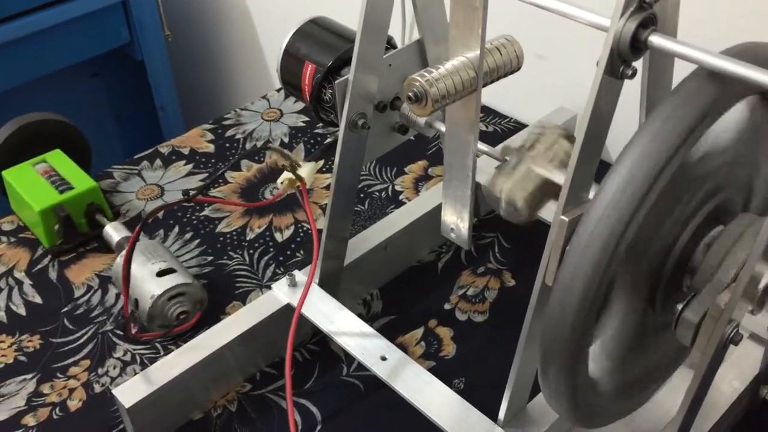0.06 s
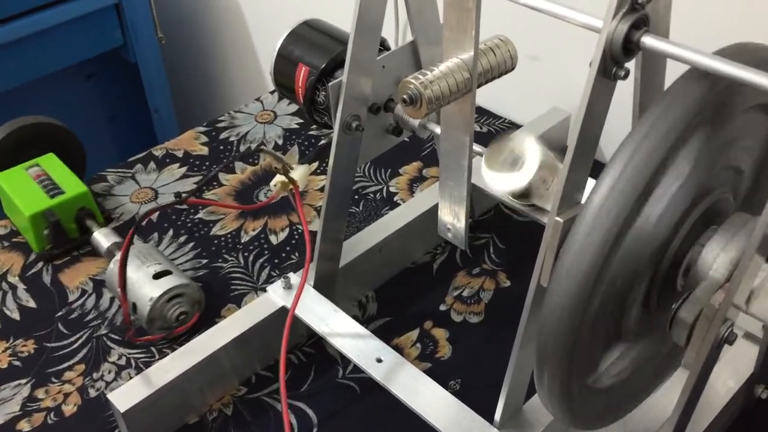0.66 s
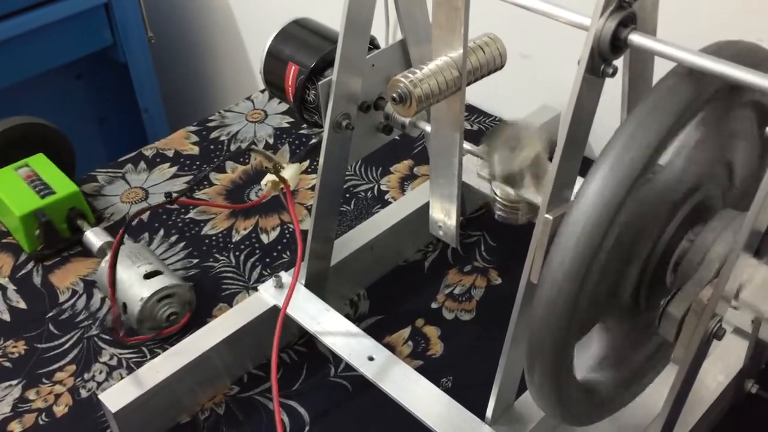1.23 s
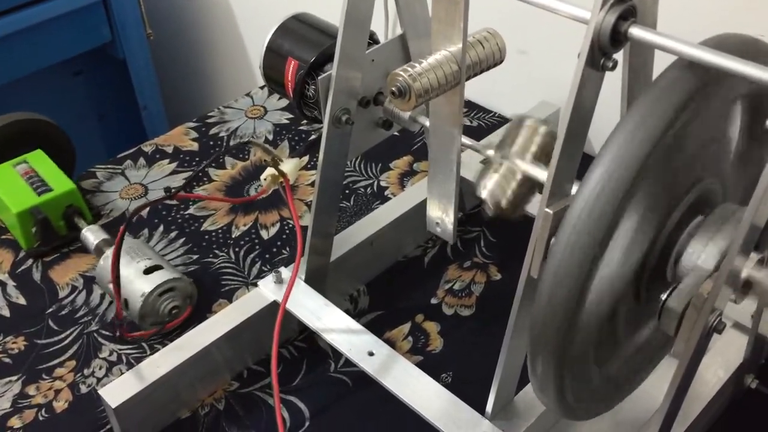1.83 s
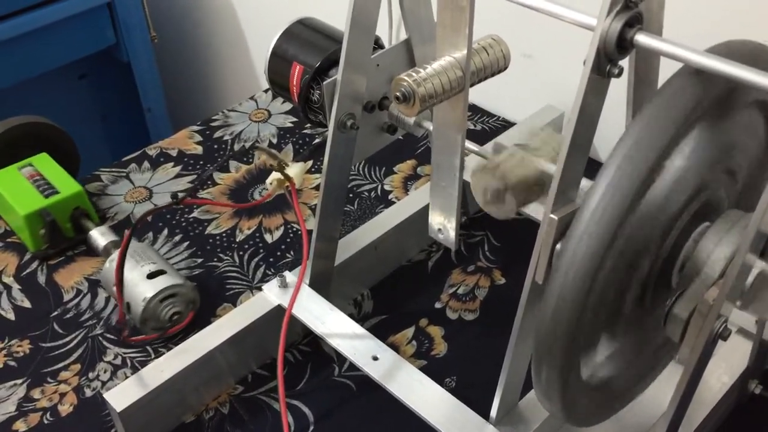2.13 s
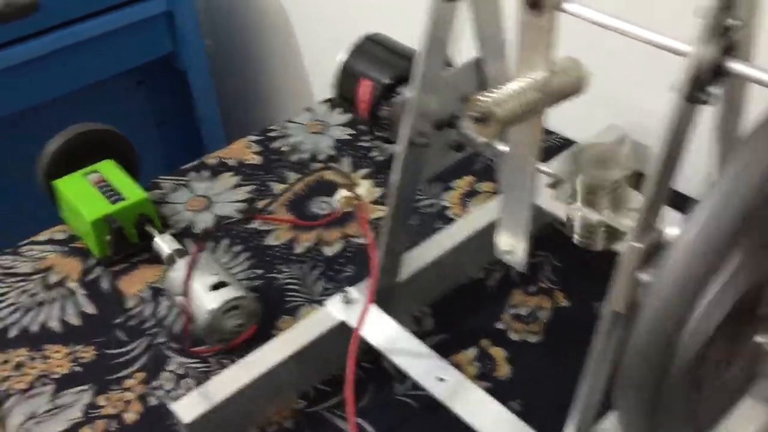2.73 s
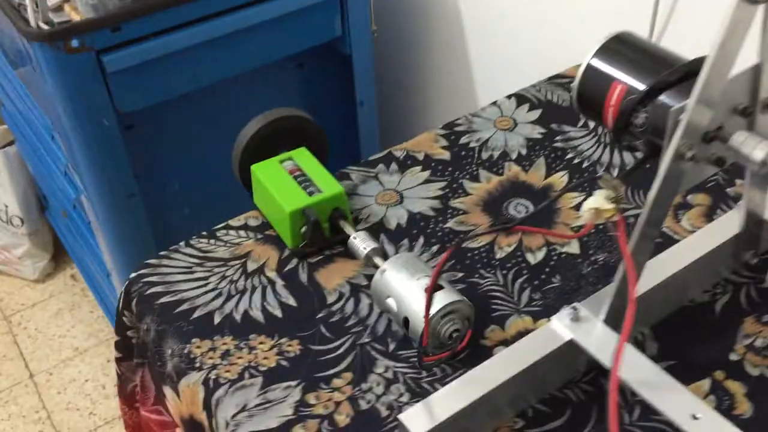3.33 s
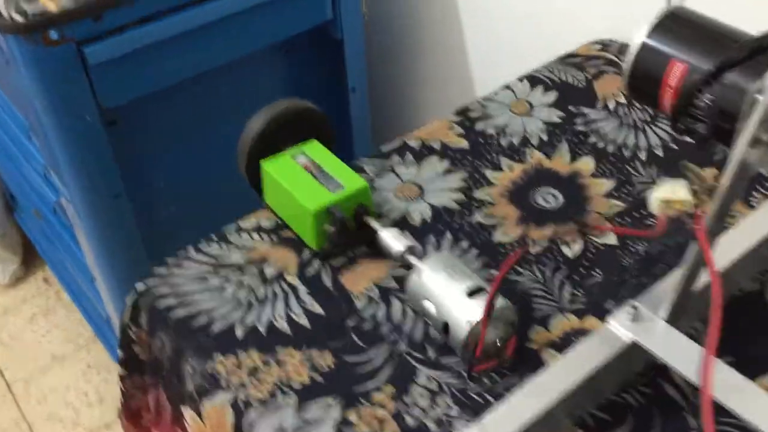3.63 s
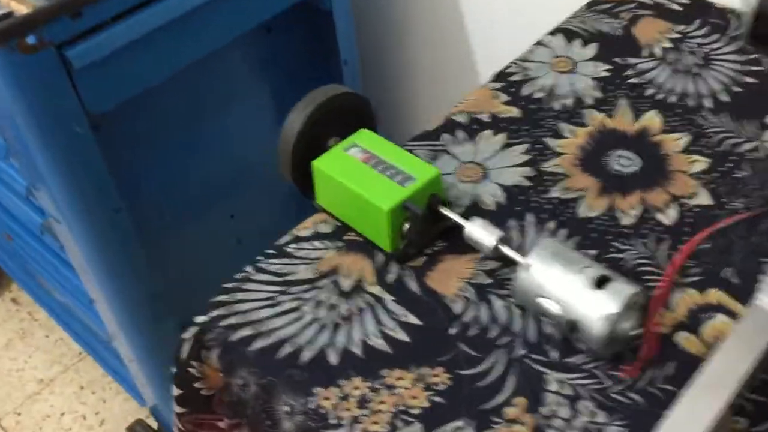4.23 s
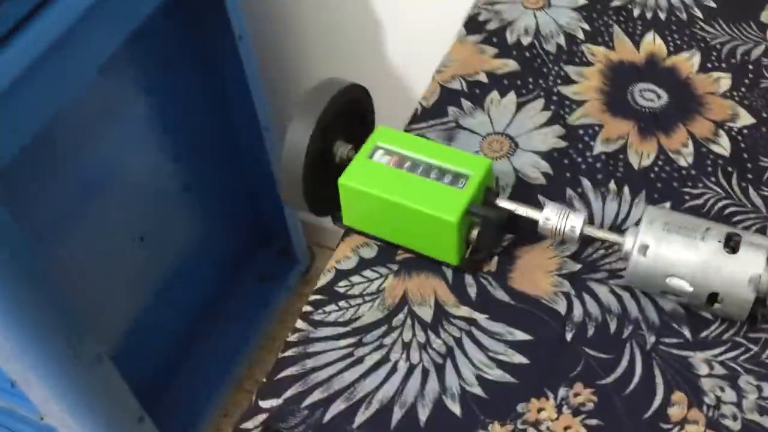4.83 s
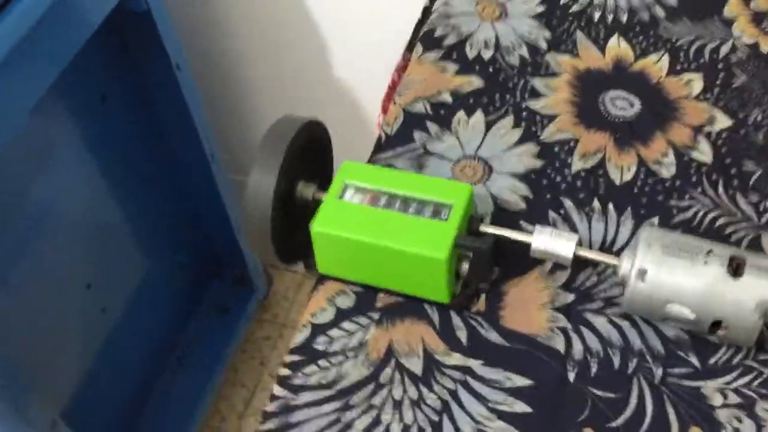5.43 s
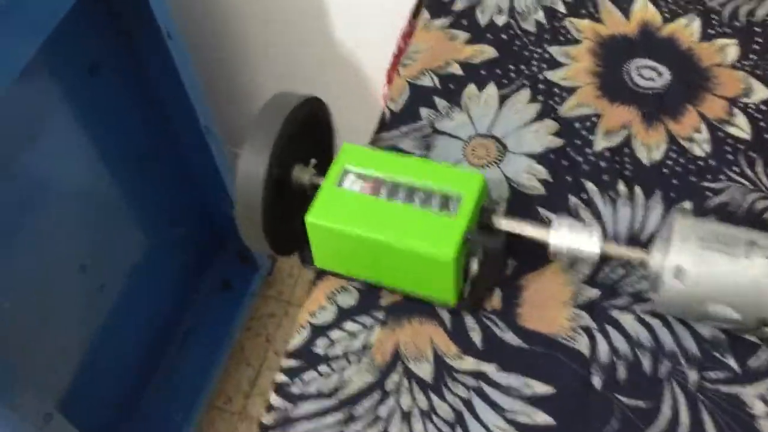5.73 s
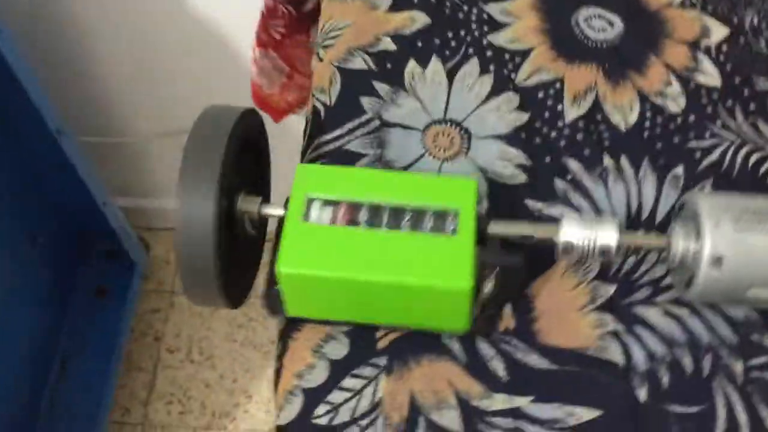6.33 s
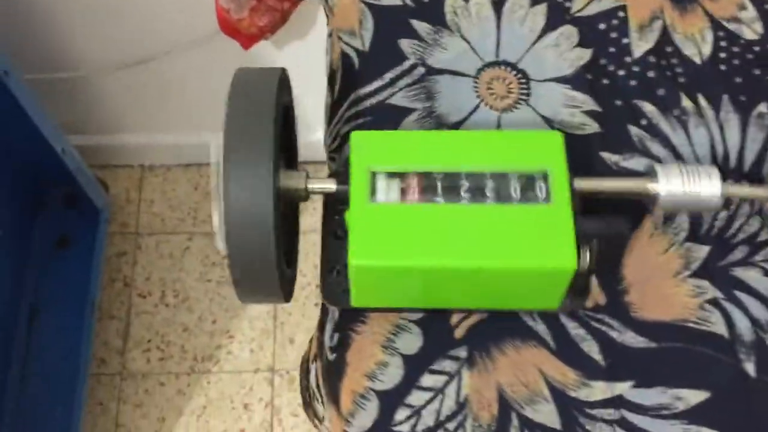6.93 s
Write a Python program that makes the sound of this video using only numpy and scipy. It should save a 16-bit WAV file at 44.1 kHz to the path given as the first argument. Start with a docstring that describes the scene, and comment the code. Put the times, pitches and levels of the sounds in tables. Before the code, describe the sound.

A motor-driven flywheel machine runs indoors with a churning whirr, light uneven metal knocks and a low, pulsing boom from the table. As the microphone moves along it, the rough whine of a small motor swells and fades. The fast, rasping chatter of a mechanical counter's gears takes over, close and louder, with a ringing whine from its plastic case and scattered sharp clicks. A faint hum continues underneath.

```python
"""Flywheel rig and turn counter

In a small room, a homemade crank-and-flywheel rig whirrs and clinks on a cloth-covered table, which
booms over a low electrical hum. Beside it a small whining motor spins a mechanical turn counter whose
gears chatter twice a turn and ring its plastic case. The microphone starts at the rig, passes over
the motor and ends close to the counter."""
import sys
import numpy as np
from scipy import signal
from scipy.fft import rfft, irfft
from scipy.io import wavfile
from scipy.ndimage import uniform_filter1d

SR = 44100
rng = np.random.default_rng(int(sys.argv[2]) if len(sys.argv) > 2 else 0)


def digitize_waveform(pressure):
    """Quantize a signal to 16-bit integers and store it at the path in sys.argv[1].

    Rows of a 2-D input are taken as channels; values are limited to [-1, 1].
    """
    field = np.atleast_2d(pressure).T
    bounded = np.clip(field, -1, 1)
    quanta = np.round(bounded * 32767).astype(np.int16)
    wavfile.write(sys.argv[1], SR, quanta)


N = 316638
TIME = np.arange(N) / SR
SHAFT_HZ, TEETH = 10.715, 15   # the counter's drive gear


# the plastic case and its gears, heard close up: (frequency [Hz], level [dB])
CASE_COLOUR = [(350, -34), (500, -38.5), (610, -18), (740, -19.5), (810, -12.5), (980, -13.5), (1060, -7.5),
               (1220, -5), (1420, 0.5), (1620, -2), (1750, -11.5), (2000, -17), (3000, -51)]
GEAR_COLOUR = [(1200, -18.5), (2000, -11), (2300, 4), (2600, -1.5), (2900, 1), (3400, -1.5), (4500, -4.5),
               (4900, -7.5), (5400, -8), (6300, -10), (7500, -16.5), (9700, -16.5), (10600, -23),
               (15500, -32.5)]
# resonances of the gears: (frequency [Hz], width [Hz], level [dB])
GEAR_RESONANCES = [(2875, 186, 0.5), (3370, 80, -19), (5240, 100, -17)]
def counter(whirr_db, rasp_db):
    """The gears bind twice a turn and strike louder under load; their brightness flickers at random."""
    bind = np.cos(4 * np.pi * (SHAFT_HZ * TIME + 0.12))
    contacts = scatter(gear_contacts(jitter=.14, uneven_db=5.0, scrape_db=3.5), fade_s=0.001)
    contacts = room(contacts * from_db(2.2 * bind), wet_db=-8.5, t60=0.17)
    clatter = from_db(whirr_db - 6.3) * steady(body(contacts, CASE_COLOUR), size=3000)
    # the case's main resonance rings on from tooth to tooth as a whine
    note = resonance(resonance(contacts, hz=1576, width=50), hz=1576, width=50)
    whine = from_db(whirr_db - 5.8 + 2 * bind) * steady(note, size=2060)
    rasp = body(contacts, GEAR_COLOUR, GEAR_RESONANCES)
    dull = signal.lfilter(*signal.butter(1, 3500, fs=SR), rasp)
    flicker = from_db(0.21 * bind + 6.4 * wander(per_s=21))
    return clatter + whine + from_db(rasp_db - 2.3) * steady(dull + flicker * (rasp - dull), size=4120)


def gear_contacts(jitter, uneven_db, scrape_db):
    """One click per tooth, early or late through backlash, with scraping in between."""
    teeth = np.arange(int(N / SR * SHAFT_HZ * TEETH))
    lateness, force, polarity = rng.standard_normal((len(teeth), 3)).T
    at = ((teeth + jitter * lateness) / (SHAFT_HZ * TEETH) * SR).astype(int)
    clicks = np.zeros(N)
    clicks[at % N] = from_db(uneven_db * np.clip(force, -2, 2)) * np.sign(polarity)
    return rms_one(clicks) + from_db(scrape_db) * grains(per_s=4000, spread_db=3.0)


# how hard the gears catch, as heard at the microphone: (time [s], rasp level [dB])
CATCH_LEVEL = [(0, -69), (2.3, -53), (3.3, -47), (3.7, -45.5), (4.55, -48), (5.25, -45), (5.6, -40),
               (6.15, -38), (6.6, -50), (7.18, -50)]
# a tooth snags and the catch is harder: (time [s], rasp level [dB], case ring level [dB])
TOOTH_SNAGS = [(2.515, -52, -34), (3.026, -39.5, -36), (3.444, -39.5, -30.5), (3.498, -39.5, -36.5),
               (3.540, -44, -28.5), (3.637, -40, -31.5), (3.727, -43, -29.5), (3.872, -41.5, -31),
               (3.913, -42, -29.5), (3.960, -37, -34), (3.997, -50, -30), (4.099, -37.5, -31),
               (4.188, -42, -30), (4.328, -44, -29.5), (4.381, -44, -30), (4.430, -41.5, -27),
               (4.486, -48, -33), (4.562, -43, -26.5), (4.667, -42, -29.5), (4.803, -37.5, -32),
               (4.847, -38.5, -28.5), (4.889, -40, -36), (4.936, -39, -27), (5.036, -39.5, -26.5),
               (5.086, -41, -31.5), (5.222, -35, -24.5), (5.270, -37, -34), (5.313, -37.5, -23),
               (5.405, -36, -29), (5.500, -41, -31), (5.595, -36, -27.5), (5.641, -38.5, -33.5),
               (5.689, -34.5, -25.5), (5.736, -37.5, -26.5), (5.829, -37.5, -28), (5.875, -36.5, -27.5),
               (5.92, -39.5, -24), (5.965, -35, -28), (6.015, -34.5, -30.5), (6.056, -36, -23.5),
               (6.112, -43, -28), (6.154, -33, -24), (6.201, -34, -22.5), (6.248, -31.5, -23.5),
               (6.299, -35, -28.5), (6.337, -35.5, -28), (6.432, -42, -27), (6.486, -39.5, -32),
               (6.574, -40, -37), (6.708, -42, -28.5), (6.765, -41.5, -33), (6.851, -46, -30),
               (6.904, -50, -29), (7.000, -47, -28), (7.132, -37, -27)]
def catches():
    """Twice a turn several teeth strike hard in a row: a bright rasp over the ring of the case."""
    lead_s, jitter_s, build_s = .005, .004, .010
    second_catch_db, spread_db = -4.5, 3
    half_turn = np.arange(1, int(N / SR * 2 * SHAFT_HZ) + 1)
    lateness, force, ring_force = rng.uniform(-1.1, 1, (len(half_turn), 3)).T
    times = half_turn / (2 * SHAFT_HZ) - lead_s + jitter_s * lateness
    rasp_db = np.interp(times, *np.transpose(CATCH_LEVEL))
    rasp_db += second_catch_db * (half_turn % 2) + spread_db * force
    ring_db = rasp_db + 10 + 2.5 * ring_force
    for snag in TOOTH_SNAGS:
        nearest = np.argmin(abs(times - snag[0]))
        times[nearest], rasp_db[nearest], ring_db[nearest] = snag
    rasp = bursts(times - build_s, rasp_db, hard_contact(),
                  rise_s=0.0045, fade_s=0.012, bounce_s=0.0063, contact_s=0.00089)
    ring = case_ring(times, ring_db)
    return room(rasp, wet_db=-9.5, t60=0.28) + ring


# the case's main resonance: (frequency [Hz], width [Hz], level [dB])
CASE_RESONANCES = [(1570, 28, 16.5)]
def case_ring(times, levels_db, swell_s=0.016):
    """The ring of the plastic case swells and sinks around each catch."""
    swell = np.zeros(N)
    level_over_30ms = np.sqrt(.03 / swell_s / np.sqrt(np.pi / 2))
    for at, db in zip(times, levels_db):
        during = slice(*np.searchsorted(TIME, [at - .06, at + .06]))
        bell = np.exp(-((TIME[during] - at) / swell_s) ** 2)
        swell[during] += from_db(db) * bell * level_over_30ms
    ring = body(grains(per_s=700, spread_db=1.0), CASE_COLOUR, CASE_RESONANCES)
    return swell * steady(ring, size=600)


# the pinion, rung only by hard contacts: (frequency [Hz], width [Hz], level [dB])
PINION_RESONANCES = [(2910, 46, -1.5), (3020, 45, -4), (3740, 53, -4.5), (4520, 87, -3), (5330, 110, 0),
                     (6280, 170, -4), (8230, 300, -5), (10030, 230, -8), (12500, 200, -5)]
def hard_contact():
    """Ring of the gears when struck hard, with more treble than in free running."""
    return signal.lfilter([1, -.3], [1], response(GEAR_COLOUR, GEAR_RESONANCES + PINION_RESONANCES))


# crisp clicks, close to the counter: (time [s], level [dB])
TOOTH_SLAPS = [(3.7226, -43), (3.777, -43), (3.993, -55), (4.142, -42), (4.277, -43.5), (4.370, -50),
               (4.464, -43), (4.553, -47), (5.269, -37.5), (5.4925, -39), (5.957, -38.5), (6.053, -38),
               (6.238, -40), (6.608, -35.5), (6.625, -41), (6.767, -43), (6.8507, -38.5), (6.889, -38.5),
               (6.943, -38), (6.9475, -43), (7.044, -53), (7.081, -42)]
def slaps():
    """A single tooth slaps across its backlash: a bright click and a short ring of the case."""
    times, db = np.transpose(TOOTH_SLAPS)
    click = bursts(times, db, hard_contact(),
                   rise_s=0.00046, fade_s=0.0022, bounce_s=0.0044, contact_s=0.0028)
    ring = bursts(times, db + 2, response(CASE_COLOUR),
                  rise_s=0.00022, fade_s=0.0022, bounce_s=.004, contact_s=0.002)
    return room(click + ring, wet_db=-8.5, t60=0.13)


# one-off hits near the microphone: (time [s], level [dB])
METAL_TICKS = [(5.564, -28)]
CASE_KNOCKS = [(5.2688, -27)]
STEEL_PINGS = [(4.142, -41.5)]
# what each hit rings: (frequency [Hz], level [dB], t60 [s])
TICK_RING = [(6350, -3, 0.03), (6560, 2, 0.022), (8500, 0, 0.014), (11200, 3, 0.011), (12500, -6, .01),
             (14000, -12, .008)]
KNOCK_RING = [(743, -1, 0.042), (1180, -7, .025), (2310, -4, .04), (6500, -2, 0.02)]
PING_RING = [(3470, 2, 0.34), (3500, 0, .3)]
def jolted_parts():
    """A bright metal tick, a hollow knock of the counter's case and the ping of a jolted steel part."""
    tick = struck(METAL_TICKS, TICK_RING)
    knock = struck(CASE_KNOCKS, KNOCK_RING)
    return tick + knock + struck(STEEL_PINGS, PING_RING)


# whirr and rasp, heard from beside the rig: (frequency [Hz], level [dB])
RIG_WHIRR_COLOUR = [(300, -18.5), (500, -29), (620, -16), (740, -22), (800, -11.5), (880, -16.5),
                    (1050, -15), (1120, -15.5), (1210, -3), (1400, 0), (1640, -1.5), (1730, -15),
                    (1880, -8), (2050, -44.5), (3000, -46)]
RIG_RASP_COLOUR = [(1200, -20), (2200, 7.5), (2900, -2), (3700, -3.5), (4100, -11.5), (5600, -14),
                   (6700, -13), (7500, -26.5), (9700, -19.5), (10700, -36), (12000, -22.5), (15500, -71)]
# resonances of the frame: (frequency [Hz], width [Hz], level [dB])
FRAME_RESONANCES = [(3010, 25, 2), (3770, 79, -2), (4480, 60, 7.5), (5430, 120, 6.5), (11500, 30, 8)]
def rig(whirr_db, rasp_db):
    """Brushes, belt and bearings: dense contacts ringing the aluminium frame, churning with the load."""
    churn = wander(per_s=24)
    contacts = room(grains(per_s=1200, spread_db=2.0), wet_db=-5.5, t60=0.14)
    wavering = waver(body(contacts, RIG_WHIRR_COLOUR), sway_s=.0005, per_s=18)
    whirr = from_db(whirr_db + .7 * churn) * steady(wavering, size=2400)
    rasp = body(scatter(contacts, fade_s=0.00094), RIG_RASP_COLOUR, FRAME_RESONANCES)
    return whirr + from_db(rasp_db + 1.0 + 0.81 * churn) * steady(rasp)


# knocks in the crank links while the microphone is near the rig: (time [s], level [dB], fade [s])
LINK_KNOCKS = [(0.022, -52, .004), (0.098, -52, 0.0033), (0.2145, -50, .004), (0.3072, -56, .003),
               (0.3845, -50, .004), (0.5225, -51.5, .003), (0.672, -55, .003), (0.7906, -46, .006),
               (0.893, -59, .003), (0.9585, -49, .006), (1.2435, -59, .003), (1.268, -54, .003),
               (1.368, -55, .006), (1.458, -50, .003), (1.518, -53, .003), (1.5535, -52, .004),
               (1.7346, -47, 0.0046), (1.756, -50, .003), (2.1186, -51.5, .003), (2.2232, -51, .003),
               (2.514, -51, 0.0027), (2.778, -46, .006), (2.9377, -53, 0.0027), (3.0165, -50, 0.01),
               (3.1153, -48.5, .004), (3.168, -45.5, .004), (3.216, -46, .004), (3.4363, -41, 0.0045)]
# their ring in the frame: (frequency [Hz], level [dB])
LINK_COLOUR = [(1200, -27), (2600, -2.5), (3700, 6.5), (4200, -4), (5500, 1), (6700, -2), (7800, -8),
               (9600, -9), (10700, -21), (12000, -20), (15500, -33)]
def clinks(rattle_per_s=6.8, rattle_db=-54, rattle_fade_s=.005):
    """Loose crank pins knock in their links and ring the frame, amid a light, uneven rattle."""
    rattle_times = np.cumsum(.5 + rng.random(size=100)) / rattle_per_s
    rattle = [(at, rattle_db, rattle_fade_s) for at in rattle_times if at < N / SR]
    times, db, fade_s = np.transpose(LINK_KNOCKS + rattle)
    ring = response(LINK_COLOUR, modes=[(4490, 60, 1), (5520, 70, 7), (6770, 80, -1.0), (9700, 150, 4)])
    knocks = bursts(times, db, ring, rise_s=0.00052, fade_s=fade_s, bounce_s=0.0039, contact_s=0.0035)
    return room(knocks, wet_db=-1.5, t60=0.15)


# the whine as the microphone passes over the motor: (time [s], level [dB])
MOTOR_PASS = [(0, -54), (2.7, -58), (3.1, -44), (3.5, -37.5), (4.0, -37), (4.3, -40), (4.6, -49),
              (7.18, -48)]
# resonances of the motor's can: (frequency [Hz], width [Hz], level [dB])
CAN_RESONANCES = [(1193, 200, -1.5), (1615, 90, 1), (1701, 154, 0), (1793, 134, 1), (2154, 190, -9),
                  (2450, 270, -7.5), (2790, 110, -8), (3450, 250, -11), (5850, 560, -12.5),
                  (8440, 3300, -15)]
def small_motor():
    """Brush contacts ring the motor's can in a rough whine."""
    brushes = grains(per_s=1800, spread_db=6.0)
    whine = sum(from_db(db) * rms_one(resonance(resonance(brushes, hz, width), hz, width))
                for hz, width, db in CAN_RESONANCES)
    return from_db(in_time(MOTOR_PASS)[0]) * steady(whine)


# the table under the rig: (frequency [Hz], level [dB])
TABLE_COLOUR = [(20, -84), (36, -37), (46, -9), (70, -10), (95, -9), (115, 3), (135, -0.5), (160, -8.5),
                (210, -12.5), (300, -20.5), (480, -25), (900, -58.5)]
# its boom along the microphone's path: (time [s], level [dB])
BOOM_LEVEL = [(0, -46), (2.2, -44.5), (3.0, -43.8), (3.4, -48.5), (4.2, -46.5), (4.85, -56), (5.5, -53),
              (5.95, -46), (6.3, -51.5), (7.18, -46.5)]
# the flywheel lurches and the boom swells: (time [s], boost [dB])
FLYWHEEL_LURCHES = [(0.61, 4), (2.53, 2), (2.80, 4), (3.81, 5), (5.79, 7), (6.02, 2.5), (6.61, 9)]
def table_boom(throb_hz=3.688, throb_peak_s=.056, throb_db=1.5, lurch_s=0.034, split_hz=191):
    """The running rig shakes the table: a throbbing boom at its own note, with an even rumble above."""
    shaking = steady(body(rng.standard_normal(N), TABLE_COLOUR, modes=[(124.4, 9.7, -4.5)]))
    boom = signal.sosfiltfilt(signal.butter(3, split_hz, fs=SR, output="sos"), shaking)
    rumble = from_db(-47) * (shaking - boom)
    throb = throb_db * np.cos(2 * np.pi * throb_hz * (TIME - throb_peak_s)) + 0.15 * wander(per_s=14)
    lurch = sum(db * np.exp(-((TIME - at) / lurch_s) ** 2) for at, db in FLYWHEEL_LURCHES)
    return from_db(in_time(BOOM_LEVEL)[0] + throb + lurch) * boom + rumble


# background hum, the same all along the path: (frequency [Hz], level [dB])
ELECTRICAL_TONES = [(94, -61.5), (100, -57), (118, -56), (150, -63), (172, -68.5), (215, -68.5), (403, -71)]
def electrical_hum():
    """The mains and the motors' rotors hum in steady tones."""
    return sum(from_db(db) * np.sqrt(2) * np.sin(2 * np.pi * (hz * TIME + rng.random()))
               for hz, db in ELECTRICAL_TONES)


def bursts(times, levels_db, ring, rise_s, fade_s, bounce_s, contact_s, size=2600):
    """Each burst is a swelling, fading run of short gritty bounces; its level is the rms over 30 ms."""
    out, age = np.zeros(N + 4 * size), TIME[:size]
    for at, db, fade in zip(times, levels_db, np.broadcast_to(fade_s, len(times))):
        shape = (1 - np.exp(-age / rise_s)) ** 2 * np.exp(-age / fade)
        since_bounce = age % (bounce_s * rng.uniform(.75, 1.25))
        bounces = rng.standard_normal(size) * (0.28 + np.exp(-since_bounce / contact_s))
        burst = signal.fftconvolve(bounces * shape, ring)
        start = max(int(at * SR), 0)
        out[start:start + len(burst)] += from_db(db) * np.sqrt(.03 * SR) * burst / np.linalg.norm(burst)
    return out[:N]


def struck(hits, modes):
    """Two small parts touch and ring for an instant; they radiate little below their lowest mode."""
    out = np.zeros(N)
    for at, db in hits:
        age = np.clip(TIME - at, 0, .5)
        out += sum(from_db(db + mode_db - 60 * age / t60) * np.sin(2 * np.pi * hz * age)
                   for hz, mode_db, t60 in modes)
    out = signal.sosfilt(signal.butter(5, .82 * modes[0][0], "high", fs=SR, output="sos"), out)
    return room(out, wet_db=-15, t60=.12)


def grains(per_s, spread_db):
    """Tiny contacts at random moments, of uneven size; rms 1."""
    sizes = from_db(spread_db * np.minimum(rng.exponential(1, N), 4)) * rng.choice([-1, 1], N)
    return rms_one(sizes * (rng.random(N) < per_s / SR))


def body(x, colour, modes=()):
    """Contacts heard through a ringing body."""
    return signal.fftconvolve(x, response(colour, modes))[:N]


def response(colour, modes=(), size=4096):
    """Causal ring of a body, of unit energy: a broad colour plus a few sharp resonances."""
    hz, db = np.transpose(colour)
    bin_hz = np.arange(size // 2 + 1) * SR / size
    gain = from_db(np.interp(np.log(bin_hz + 1), np.log(hz), db))
    cepstrum = irfft(np.log(gain))[:size // 2]
    cepstrum[1:] *= 2   # minimum phase
    ring = irfft(np.exp(rfft(cepstrum, size)))
    ring = ring + sum(from_db(lift) * resonance(ring, centre, width) for centre, width, lift in modes)
    return ring / np.linalg.norm(ring)


def resonance(x, hz, width):
    """Two-pole band-pass with gain 1 on top."""
    r = np.exp(-np.pi * width / SR)
    poles = [1, -2 * r * np.cos(2 * np.pi * hz / SR), r * r]
    return signal.lfilter(np.array([1, 0, -1]) * (1 - r * r) / 2, poles, x)


def scatter(x, fade_s):
    """Paths of slightly different length through the casing spread each click over a millisecond or two."""
    r = np.exp(-1 / (fade_s * SR))
    for hz in np.linspace(1200, 14000, num=26) + rng.uniform(-250, 250, 26):
        poles = [1, -2 * r * np.cos(2 * np.pi * hz / SR), r * r]
        x = signal.lfilter(poles[::-1], poles, x + 1e-18)   # all-pass
    return x


def room(x, wet_db, t60, size=16000):
    """Direct sound and a diffuse tail from the close walls."""
    age = TIME[:size]
    tail = rng.standard_normal(size) * from_db(-60 * age / t60) * (age > .003)
    wet = from_db(wet_db)
    return (x + wet * signal.fftconvolve(x, tail / np.linalg.norm(tail))[:N]) / np.sqrt(1 + wet ** 2)


def waver(x, sway_s, per_s):
    """Bend the pitch to and fro by reading the sound a little early or late."""
    return np.interp(TIME + sway_s * wander(per_s), TIME, x)


def wander(per_s):
    """Smooth random swings of spread 1."""
    steps = rng.standard_normal(int(N / SR * per_s) + 2)
    return rms_one(np.interp(TIME * per_s, np.arange(len(steps)), steps))


def steady(x, size=5000):
    """Hold the running rms at 1, leaving the fast flutter."""
    return x / np.sqrt(np.maximum(uniform_filter1d(x ** 2, size), 1e-20))


def rms_one(x):
    """Scale to rms 1."""
    return x / np.sqrt(np.mean(x ** 2) + 1e-20)


def from_db(db):
    """Decibels to gain."""
    return 10 ** (np.asarray(db) / 20)


def in_time(rows):
    """Columns of a curve at every sample."""
    times, *columns = np.transpose(rows)
    return [np.interp(TIME, times, column) for column in columns]


# the walk from rig to counter: (time [s], whirr level [dB], counter's share [0-1])
MICROPHONE_PATH = [(0, -36.5, .02), (1.7, -36.5, .04), (2.8, -33, .35), (3.4, -31.5, .7), (4.0, -29.5, .75),
                   (4.45, -31, .8), (5.3, -27.5, .92), (6.2, -26.5, .92), (7.18, -26.5, .92)]
def scene():
    """The counter takes over from the rig as the microphone nears it."""
    whirr_db, near = in_time(MICROPHONE_PATH)
    rasp_db = whirr_db - 9.5
    machines = np.sqrt(1 - near) * rig(whirr_db, rasp_db) + np.sqrt(near) * counter(whirr_db, rasp_db)
    impacts = catches() + slaps() + clinks() + jolted_parts()
    return (machines + impacts + small_motor() + table_boom() + electrical_hum())[None]


def record(dry, low_cut_hz=38, high_cut_hz=15450):
    """One small microphone drops the deep bass; the top is cut steeply."""
    thin = signal.sosfilt(signal.butter(6, low_cut_hz, "high", fs=SR, output="sos"), dry)
    return signal.sosfilt(signal.ellip(12, .1, 90, high_cut_hz, fs=SR, output="sos"), thin)


dry = scene()
out = record(dry)
digitize_waveform(out)
```